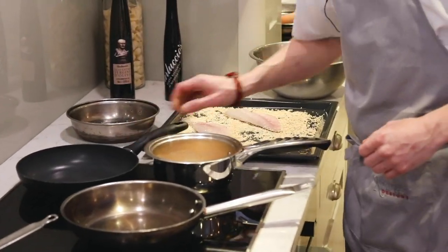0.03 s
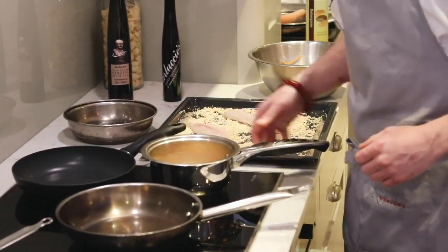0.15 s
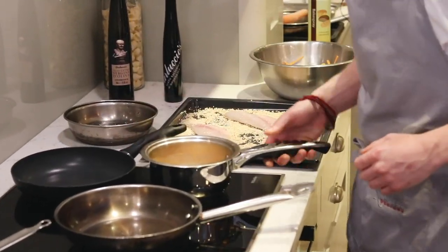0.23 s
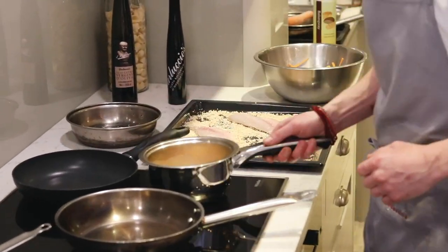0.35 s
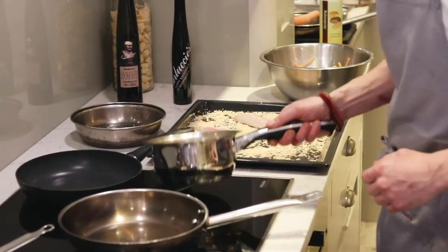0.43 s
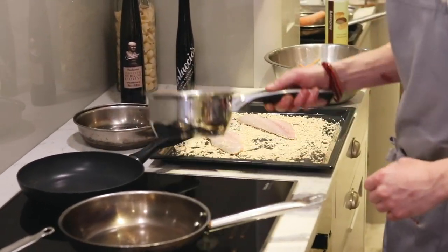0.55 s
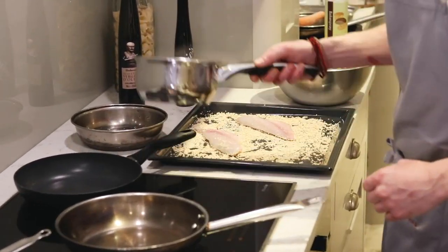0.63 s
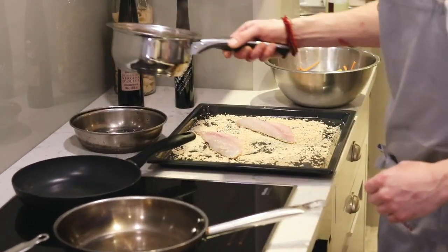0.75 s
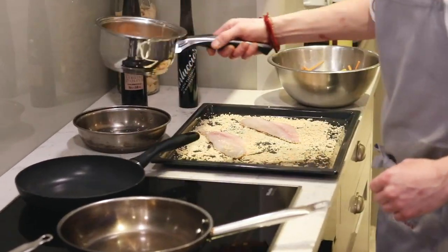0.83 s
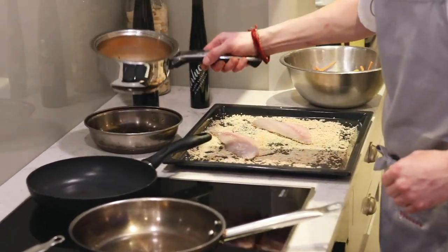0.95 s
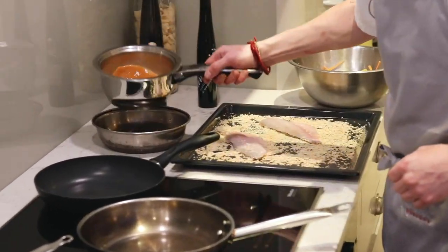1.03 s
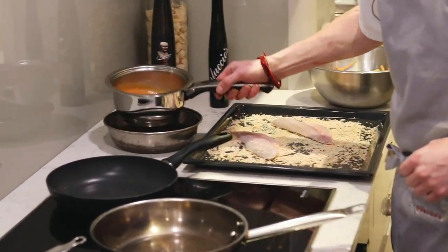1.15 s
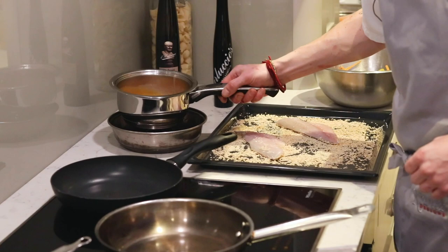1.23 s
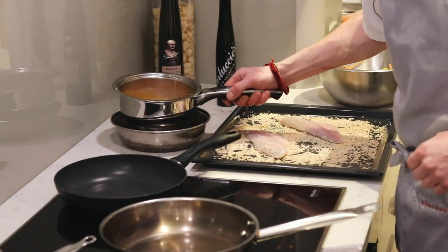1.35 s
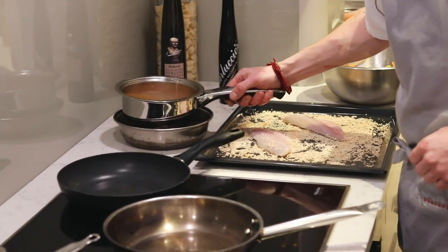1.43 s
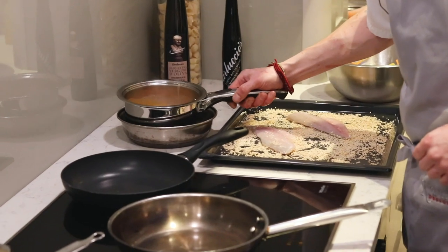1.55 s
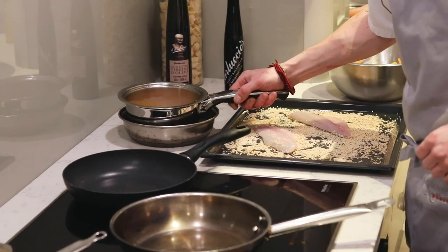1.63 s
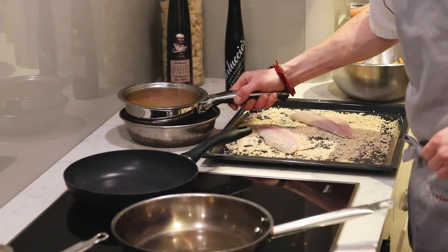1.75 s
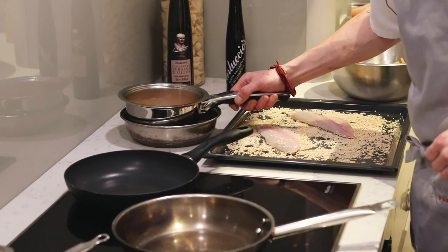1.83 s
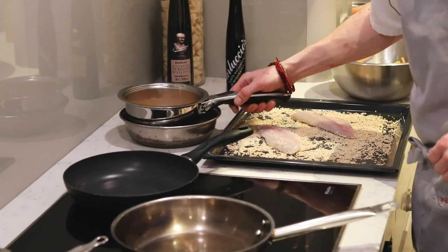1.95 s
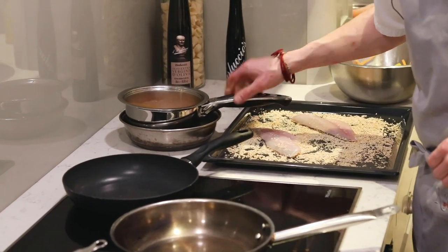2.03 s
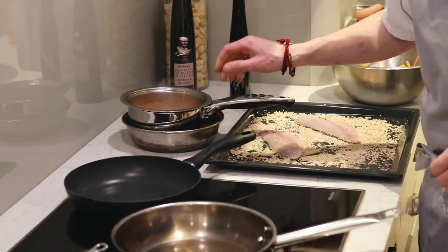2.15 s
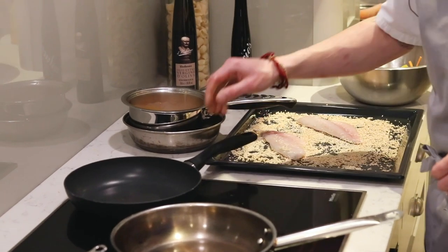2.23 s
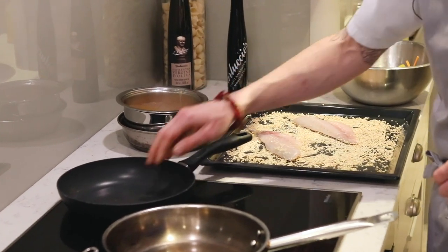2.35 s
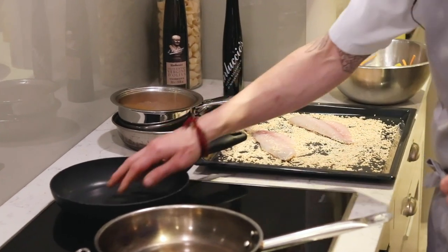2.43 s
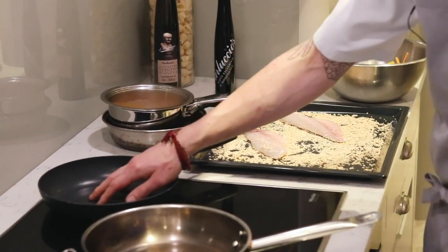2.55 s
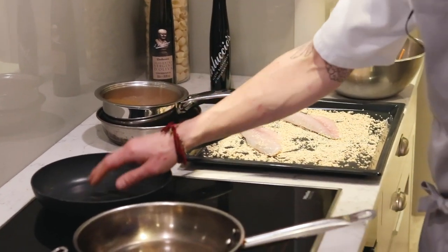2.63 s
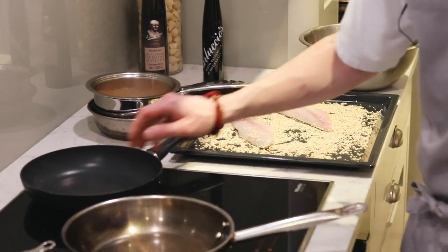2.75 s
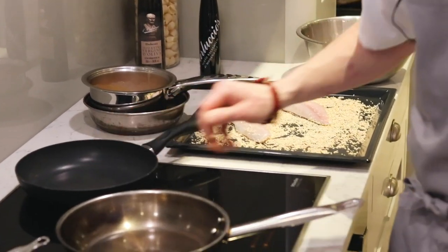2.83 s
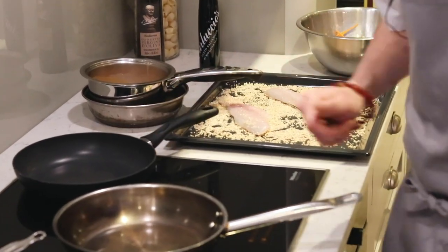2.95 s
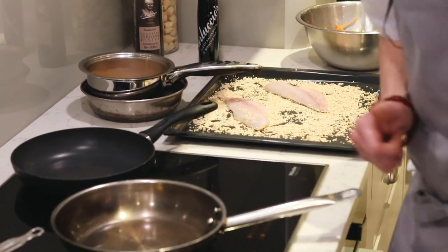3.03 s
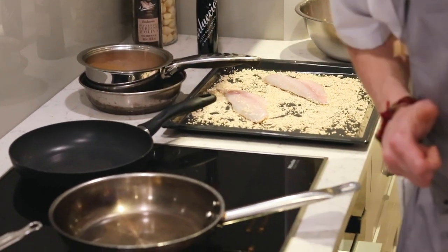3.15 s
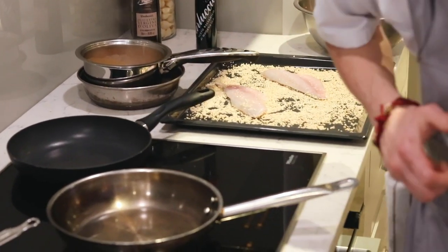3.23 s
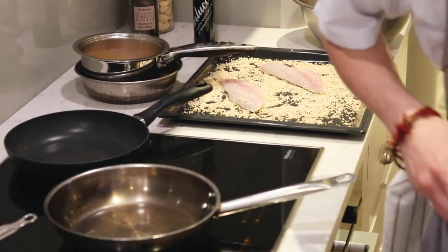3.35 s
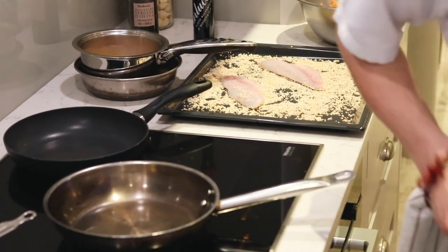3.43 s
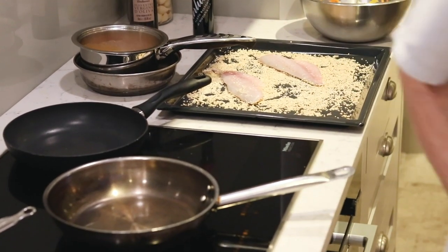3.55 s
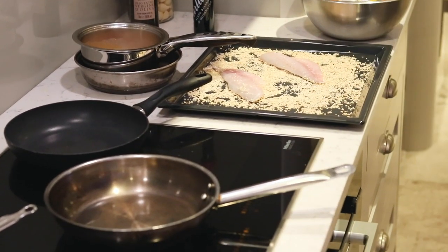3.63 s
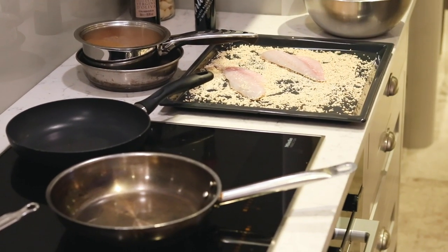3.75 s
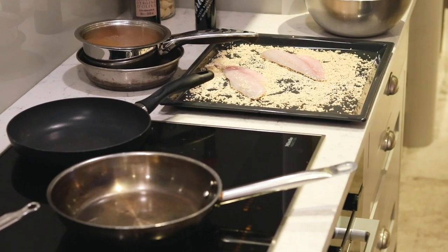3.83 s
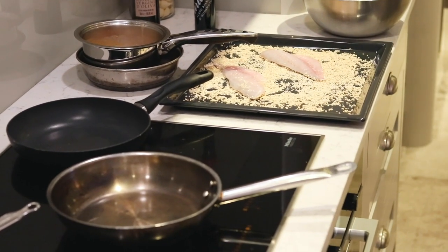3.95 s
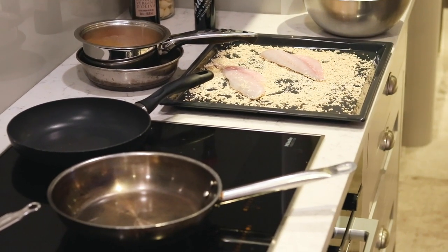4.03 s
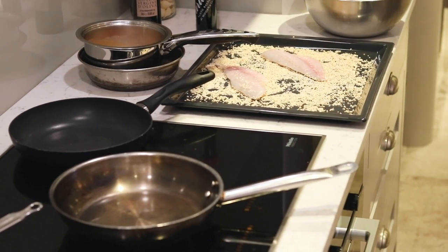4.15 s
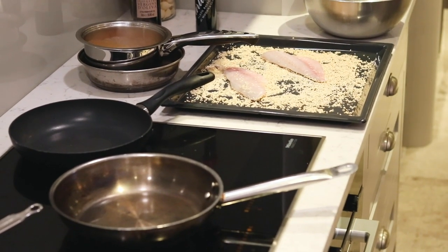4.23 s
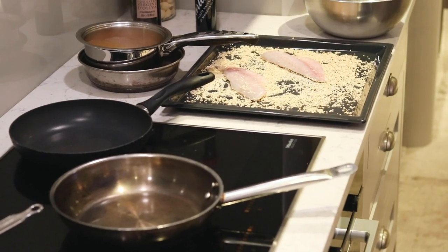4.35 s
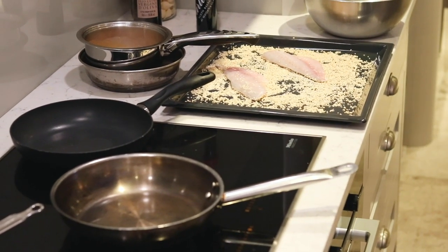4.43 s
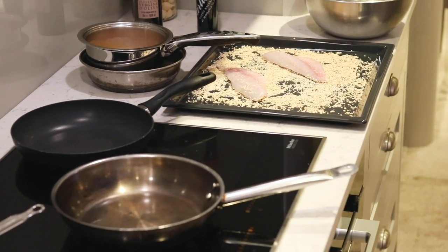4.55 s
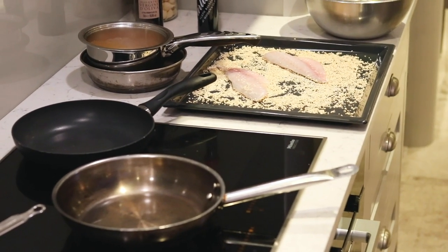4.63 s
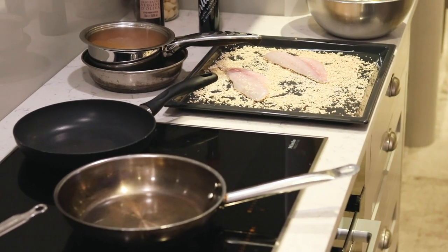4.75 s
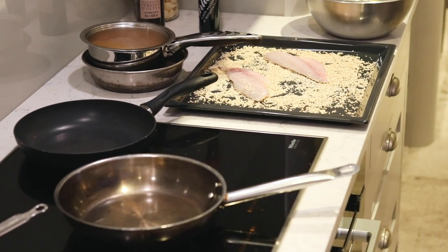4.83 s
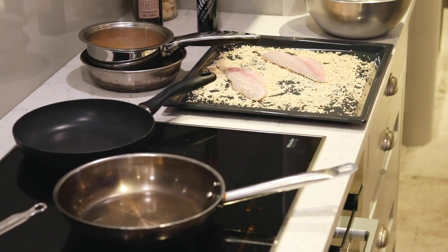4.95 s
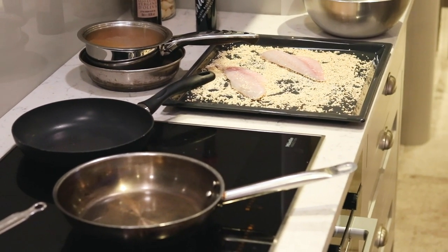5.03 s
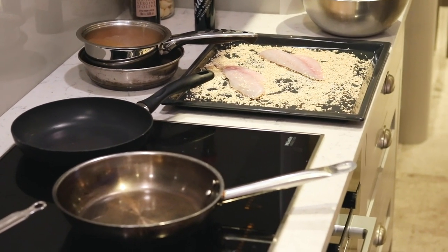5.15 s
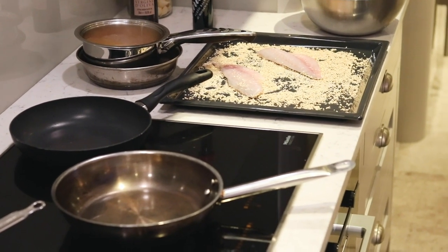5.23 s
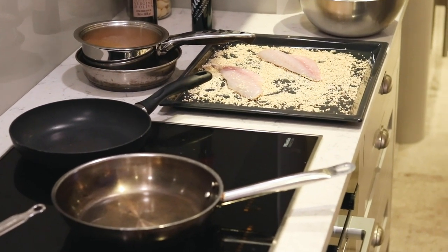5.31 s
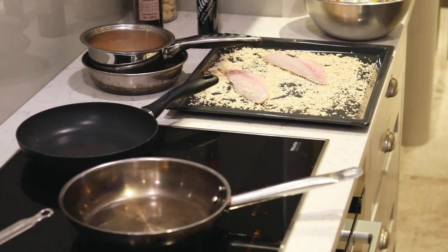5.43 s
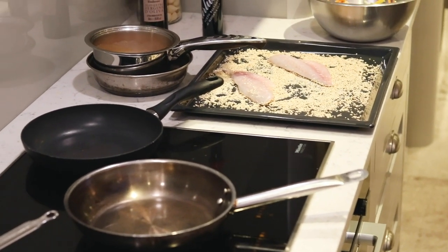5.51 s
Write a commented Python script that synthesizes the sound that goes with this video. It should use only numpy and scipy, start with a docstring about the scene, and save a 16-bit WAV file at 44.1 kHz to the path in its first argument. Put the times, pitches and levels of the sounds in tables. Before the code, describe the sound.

A small, hard-surfaced kitchen with a faint low hob hum and thin metallic hiss. A saucepan is lifted with a light scrape, then lands with a loud ringing clank in a shallow steel pan. It rocks twice on its rim and its handle ticks. Soft thuds and a hissing surge follow, then a hollow drawer creak and a late short slide ending in dull knocks. Close microphone, nearly mono.

```python
"""A saucepan in a small kitchen

A saucepan lands in a shallow steel pan, rocks twice on its rim and its handle ticks: blows, ringing modes and noise.
The hob hums at twice the mains, and noise pulsing at that rate hisses through the pans' high resonances.
Soft thuds and a drawer's creak are fading sine notes; a drawer, a slide and rustles are shaped friction noise.
A hard small kitchen answers with fading noise tails, over steady air noise."""
import sys
import numpy as np
from scipy import signal
from scipy.fft import rfft, irfft, next_fast_len
from scipy.io import wavfile
from scipy.ndimage import uniform_filter1d, map_coordinates

SR = 44100
rng = np.random.default_rng(int(sys.argv[2]) if len(sys.argv) > 2 else 0)


def store_pcm(level_fs):
    """Save levels as 16-bit WAV."""
    pcm = np.round(np.clip(level_fs, -1, 1) * 32767).astype(np.int16)
    wavfile.write(sys.argv[1], SR, np.atleast_2d(pcm).T)


N = 246078
HUM_HZ = 100


def amp(db):
    """Turn decibels into a gain."""
    return 10 ** (np.asarray(db) / 20)


def unit(x):
    """Scale a signal to rms 1."""
    return x / np.sqrt(np.mean(x ** 2) + 1e-20)


def along(points, hz):
    """Read a curve of (hz, value) points, with straight lines on a log frequency axis."""
    point_hz, values = np.transpose(points)
    return np.interp(np.log(hz + 1), np.log(point_hz + 1), values)


def curves(rows, outside=None):
    """Draw each column after the time as a curve with one value per sample."""
    times, *columns = np.transpose(rows)
    return [np.interp(np.arange(N) / SR, times, column, outside, outside) for column in columns]


def wobble(rate):
    """A smooth random curve through this many random points a second."""
    points = rng.standard_normal(int(N * rate / SR) + 4)
    return map_coordinates(points, [np.arange(N) * rate / SR])


def filtered(x, response):
    """Multiply the spectrum of x by a response to frequency."""
    n = x.shape[-1]
    padded = next_fast_len(n + 8192)
    return irfft(rfft(x, padded) * response(np.fft.rfftfreq(padded, 1 / SR)), padded)[..., :n]


def noise(colour, size=N):
    """Noise of rms 1 whose spectrum follows a colour table."""
    return unit(filtered(rng.standard_normal(size), lambda hz: amp(along(colour, hz))))


def notes(rows, cycles, rise_cycles):
    """Fading sine notes; lower ones swell and ring longer, as both times are counted in cycles."""
    out, t = np.zeros(N + SR), np.arange(SR // 2) / SR
    for start, db, hz in rows:
        fade = amp(db - 60 * t * hz / cycles)
        rise = 1 - np.exp(-t * hz / rise_cycles)
        out[round(start * SR):][:len(t)] += fade * rise * np.sin(2 * np.pi * hz * t)
    return out[:N]


def pressure(rows):
    """The loudness of strokes that each swell, hold and fade."""
    total = 0
    for start, rise, hold, fade, db in rows:
        times = np.cumsum([start, rise, hold, fade])
        levels = db + np.array([-30, 0, 0, -30])  # dB
        total = total + amp(curves(np.c_[times, levels], -120)[0])
    return total


def rubbed(rows, colour):
    """Friction: coloured noise roughened by a fast uneven grip and shaped by the pressure."""
    grip = amp(1.6 * wobble(250))
    return pressure(rows) * unit(grip * noise(colour))


def struck(contacts, pitches, modes, colour, wash, blow_hz,
           clatter_db, clatter_t60, wash_db, wash_t60, rise=0.00046):
    """Each contact is a short blow, clear modes, a clatter and a wash of modes too dense to tell apart."""
    out, t = np.zeros(N + SR), np.arange(SR // 2) / SR
    for start, db, ring_db, blow_db in contacts:
        # the blow loses 11.3 dB a cycle
        blow = amp(blow_db - 11.3 * blow_hz * t) * np.sin(2 * np.pi * blow_hz * t)
        ring = 0
        for hz, (level, t60) in zip(pitches, modes):
            # round pans split each mode into close pairs, which beat
            beat_hz = rng.uniform(10.3, 35)
            beats = 1 + 0.6 * np.cos(2 * np.pi * (beat_hz * t + rng.random()))
            ring = ring + amp(level - 60 * t / t60) * beats * np.sin(2 * np.pi * hz * t)
        clatter = noise(colour, size=len(t)) * amp(clatter_db - 60 * t / clatter_t60)
        dense = noise(wash, size=len(t)) * amp(wash_db - 60 * t / wash_t60)
        onset = 1 - np.exp(-t / rise)
        hit = blow + amp(ring_db) * ring + clatter + dense
        out[round(start * SR):][:len(t)] += amp(db) * hit * onset
    return out[:N]


def hum():
    """The hob hums at twice the mains, with a third partial that comes and goes."""
    # hum loudness: time_s, level_db
    loudness = [(0, -56.5), (.6, -59.5), (1.9, -55.5), (2.7, -58.5), (3.1, -59.5), (3.65, -69.5),
                (4.2, -63.5), (4.9, -65), (5.2, -67), (5.58, -67)]
    turn = 2 * np.pi * HUM_HZ * np.arange(N) / SR
    hum_db, = curves(loudness)
    base = amp(hum_db + 0.52 * wobble(7.2)) * np.sin(turn)
    partials = np.sin(3 * turn) + 0.2 * np.sin(2 * turn) + 0.2 * np.sin(6 * turn)
    upper = amp(-78 + 5.5 * wobble(5.7)) * partials
    return np.sqrt(2) * (base + upper)  # a sine of rms 1 peaks at root 2


def resonances(peaks):
    """A response with one peak for each resonance, neighbours in opposite sign."""
    def response(hz):
        total = 0
        for k, (centre, width, db) in enumerate(peaks):
            peak = 1j * hz * width / (centre ** 2 - hz ** 2 + 1j * hz * width)
            total = total + amp(db) * peak * (-1) ** k
        return total
    return response


def pan_hiss():
    """Noise pulsing at the hum rate hisses through the pans' resonances."""
    # hiss loudness: time_s, empty_pan_db, stacked_pans_db
    loudness = [(0, -72, -88), (1.2, -74, -94.5), (2.1, -72, -76.5), (2.5, -72, -63.5), (3, -72, -62.5),
                (3.6, -80, -70.5), (5.58, -88, -69.5)]
    # resonances of the empty pan: pitch_hz, width_hz, level_db
    empty_pan = [(2670, 52, -9.5), (4890, 30.9, 1), (5300, 8.7, 5), (6050, 76, -4.5), (6804, 92, -15.5),
                 (7160, 47, -12.5), (7960, 39.03, -3.5), (8900, 56, -10), (10960, 130, -13.5),
                 (12000, 81, -8.5)]
    # resonances of the stacked pans: pitch_hz, width_hz, level_db
    stacked_pans = [(2710, 48, -6), (4704, 150, -5.5), (5236, 200, 3), (6290, 89, -1.5), (6800, 86, -12.5),
                    (7580, 90, -19), (8000, 41, -11.5), (9890, 56, -8), (10264, 35, -0.5)]
    pulse = 1 + 0.3 * np.cos(2 * np.pi * HUM_HZ * np.arange(N) / SR)
    hiss = 0
    for level_db, peaks in zip(curves(loudness), (empty_pan, stacked_pans)):
        z = signal.stft(pulse * rng.standard_normal(N), nperseg=512)[2]
        # smooth random patches let each resonance come and go
        patches = uniform_filter1d(rng.standard_normal(z.shape), 5, 0)
        patches = uniform_filter1d(patches, 12, 1)
        drive = signal.istft(z * amp(1.3 * unit(patches)), nperseg=512)[1][:N]
        hiss = hiss + amp(level_db) * unit(filtered(drive, resonances(peaks)))
    return hiss


def surge():
    """A broader hiss, pulsing at the hum rate and uneven in level, surges for about a second."""
    # surge loudness: time_s, level_db
    loudness = [(2.45, -93.5), (2.55, -68.5), (2.77, -59), (2.93, -69.5), (3.14, -60), (3.31, -61.5),
                (3.42, -75), (3.55, -92)]
    # surge spectrum: frequency_hz, density_db (per Hz)
    colour = [(2350, -54), (4000, -28.5), (4480, -20.5), (4750, -8), (5220, 3), (5460, -2.5), (5780, -17),
              (6750, -20.5), (7500, -22), (9750, -46.5), (16500, -120)]
    pulse = 1 + 0.32 * np.cos(2 * np.pi * HUM_HZ * np.arange(N) / SR)
    rough = pulse * amp(1.2 * wobble(60)) * noise(colour)
    return amp(curves(loudness, -120)[0] + 2.4 * wobble(14)) * unit(rough)


def air():
    """Steady coloured noise whose level drifts slightly."""
    # air spectrum: frequency_hz, density_db (per Hz)
    colour = [(12, -48.5), (20, -18.5), (48, -11), (100, -12), (170, -15.5), (310, -12), (386, -13),
              (832, -18), (1060, -22.5), (3650, -31.5), (5080, -27), (5510, -31), (12400, -31.5),
              (13200, -31.5), (14200, -56.5), (14600, -120)]
    return amp(-65.5 + 0.7 * wobble(1.7)) * noise(colour)


def side_hiss():
    """Faint noise that goes to the two channels in opposite sign."""
    # spectrum of the left-right difference: frequency_hz, density_db (per Hz)
    colour = [(12, -28), (20, -7.5), (928, -7.5), (1190, -12), (1740, -11.5), (2170, -11.5), (12900, -6.5),
              (14000, -21.5)]
    return amp(-74.5) * noise(colour)


def thuds():
    """Soft low thuds through floor and cupboards: sine notes that die within a few cycles."""
    # thuds: start_s, level_db, pitch_hz
    rows = [(0.0, -48, 50), (0.327, -43.5, 213), (0.4, -55, 48), (2.571, -37, 62.6), (2.575, -41, 257),
            (2.6, -42.5, 76), (2.65, -46, 66), (3.109, -50.5, 168), (3.755, -49, 45.4), (4.137, -56, 130),
            (5.13, -53, 45), (5.216, -42.5, 149), (5.299, -37, 174), (5.313, -42, 170)]
    return notes(rows, cycles=7.2, rise_cycles=0.3)  # cycles to fall 60 dB, and to swell


def wooden_notes():
    """Hollow wooden notes, knocks and the jerks of a creak: sine notes that ring longer."""
    # notes: start_s, level_db, pitch_hz
    rows = [(0.0, -41.5, 270), (0.002, -44.5, 446), (0.022, -50, 617), (0.31, -44, 472),
            (0.375, -50.5, 592), (4.208, -45, 519), (4.228, -40, 486), (4.245, -47, 426), (4.3, -48, 457),
            (4.334, -44, 667), (4.353, -36.5, 456), (4.396, -35, 655), (4.418, -41.5, 433),
            (4.429, -38, 213.3), (4.48, -44.5, 430), (4.503, -54, 210)]
    return notes(rows, cycles=35.4, rise_cycles=2.36)


def lift():
    """Short bright rubbing strokes as the saucepan is lifted."""
    # strokes: start_s, rise_s, hold_s, fade_s, level_db
    rows = [(0.3, .006, 0.013, 0.033, -59.5), (0.305, 0.018, 0.014, .09, -57.5), (.36, .03, 0.14, .06, -74)]
    # spectrum: frequency_hz, density_db (per Hz)
    colour = [(530, -43), (900, -10), (1390, -12.5), (1610, -6), (2460, -5.5), (3010, -8.5), (3360, -1),
              (13000, -17)]
    return rubbed(rows, colour)


def taps():
    """A pan ticks on the hob: hard contacts with a few high modes."""
    # contacts: start_s, level_db, ring_db, blow_db
    contacts = [(0.305, -49.5, -5, -4), (2.814, -34, -16, -10), (5.3255, -50, -18.5, -10)]
    # mode pitches: pitch_hz
    pitches = [4900, 5086, 5900, 8000]
    # modes: level_db, t60_s (time to fall 60 dB)
    modes = [(12, 0.039), (-18, 0.056), (4, 0.09), (1, 0.017)]
    # spectrum of clatter and wash: frequency_hz, density_db (per Hz)
    colour = [(1470, -68), (2500, -43), (3890, -44), (5020, 10), (6050, -38), (6430, -36), (13000, -52)]
    return struck(contacts, pitches, modes, colour, colour, blow_hz=4500, clatter_db=-3.0,
                  clatter_t60=0.03, wash_db=-13.5, wash_t60=0.15, rise=0.00032)


def landing():
    """The saucepan lands: a cluster of contacts sets many steel modes ringing."""
    # contacts: start_s, level_db, ring_db, blow_db
    contacts = [(1.2188, -7.5, -28, -19.5), (1.2202, -7.5, -29, 7.5), (1.2275, -9, -15.5, 1),
                (1.231, -15, -17.5, -6)]
    # mode pitches: pitch_hz
    pitches = [150, 260, 335, 452, 583, 716, 875, 1300, 1675, 1778, 2471, 2105, 4562, 4680, 4802, 5021,
               5211, 5910, 6115, 6331, 6853, 7560, 7693, 8323, 8882, 9900, 10900, 11340, 12140]
    # modes: level_db, t60_s
    modes = [(-1.5, 0.019), (-17, 0.44), (-6, 0.072), (-4.5, .2), (-8.5, 0.11), (-6.5, .2), (-5, 0.53),
             (-2, 0.36), (-4, .3), (-25.5, 1), (-8.5, 0.22), (-10, 0.23), (-30.5, 0.34), (-16.5, 0.2),
             (-8, 0.32), (-26, 0.453), (-16, 0.45), (-7, 0.11), (-23.5, .55), (-19.5, 0.1), (-30, 0.47),
             (-8, 0.24), (-19, 0.13), (-41, .2), (-24.5, 0.31), (-31, 0.42), (-21.5, .2), (-20.5, .27),
             (-26.5, .28)]
    # spectra of the clatter and the wash: frequency_hz, density_db (per Hz)
    colour = [(47, -40), (80, -6), (777, -7.5), (1610, -4), (1920, -9.5), (3640, -6), (4850, -8),
              (5500, -24.5), (5920, -2.5), (6610, -3.5), (6900, -4), (7200, -17.5), (7700, -3.5),
              (8200, -18.5), (8900, -9.5), (10500, -16), (11700, -10.5), (15600, -36)]
    wash = [(150, -37), (340, -16.5), (530, 1.5), (880, 0), (1150, -2), (1730, 1.5), (2300, -8),
            (3300, -12), (4200, -22), (4850, -11.5), (5550, -38), (6050, -19.5), (7700, -24.5),
            (13500, -46)]
    return struck(contacts, pitches, modes, colour, wash, blow_hz=653, clatter_db=-7,
                  clatter_t60=0.046, wash_db=-22.0, wash_t60=0.6)


def rocking():
    """The saucepan rocks twice on its rim, each time striking lower and middle modes."""
    # contacts: start_s, level_db, ring_db, blow_db
    contacts = [(1.7072, -13, -16, 7.4), (1.8214, -14.5, -15.5, 12.6)]
    # mode pitches: pitch_hz
    pitches = [441, 732, 856, 1025, 1148, 1190, 1227, 1365, 1500, 1830, 2089, 2395, 2546, 3042, 3354, 3413,
               4786]
    # modes: level_db, t60_s
    modes = [(-14, 0.15), (-11, 0.055), (-3, 0.17), (-15, 0.35), (-9, 0.088), (3, 0.21), (-9, 0.23),
             (0, 0.145), (-5, 0.144), (3.5, 0.059), (-10.5, 0.14), (-9.5, 0.25), (-5.5, 0.2), (-22.5, 0.14),
             (-10.5, 0.13), (-22.5, 0.2), (-20, 0.11)]
    # spectra of the clatter and the wash: frequency_hz, density_db (per Hz)
    colour = [(71, -58), (120, -29), (720, -15), (933, -16.5), (1190, -7), (2380, -14), (2580, -19.5),
              (3020, -28), (3340, -24), (9030, -32), (14000, -54.5)]
    wash = [(88, -62), (150, -40), (310, -13), (532, -6), (864, -12), (954, -20), (1200, -2.5), (2180, -34),
            (2480, -15), (2700, -20), (4500, -35.5), (5850, -64), (9900, -120)]
    return struck(contacts, pitches, modes, colour, wash, blow_hz=1125, clatter_db=-11.5,
                  clatter_t60=0.093, wash_db=-14.5, wash_t60=0.23)


def handle_ticks():
    """The saucepan handle ticks: very sudden contacts with high modes."""
    # contacts: start_s, level_db, ring_db, blow_db
    contacts = [(1.8344, -26.5, -14.5, -14), (1.8894, -37.5, -29, 2), (2.2646, -24.5, -12, 3.5)]
    # mode pitches: pitch_hz
    pitches = [2697, 5103, 5233, 5642, 6417, 7569, 10215]
    # modes: level_db, t60_s
    modes = [(-22.5, .2), (0, 0.11), (-2, 0.079), (-20, 0.2), (-23, 0.34), (-19, 0.13), (-5, 0.13)]
    # spectra of the clatter and the wash: frequency_hz, density_db (per Hz)
    colour = [(880, -59.5), (1500, -45), (2700, -19.5), (4190, -11.5), (5250, 6.5), (8610, -35),
              (10400, -3), (11000, -36.5), (14000, -30)]
    wash = [(1060, -69), (1800, -23), (2610, -2.5), (2840, -6), (4220, -6), (5190, -2), (7170, -13),
            (9260, -16), (10400, -8), (13000, -33)]
    return struck(contacts, pitches, modes, colour, wash, blow_hz=4800, clatter_db=-7.0,
                  clatter_t60=0.044, wash_db=-22.5, wash_t60=0.2, rise=0.0001)


def steel():
    """All struck steel, with everything below about 90 Hz cut away."""
    hits = taps() + landing() + rocking() + handle_ticks()
    return filtered(hits, lambda hz: (1j * hz / (90 + 1j * hz)) ** 3)


def rustle():
    """Faint rustles of hands and cloth: soft, broad friction noise."""
    # strokes: start_s, rise_s, hold_s, fade_s, level_db
    rows = [(2.075, 0.021, .004, 0.019, -66), (2.9, 0.079, 0.23, 0.12, -71.5),
            (4.08, 0.092, 0.065, .07, -69), (4.29, 0.035, .005, 0.064, -73), (5.35, 0.028, .005, 0.21, -65),
            (5.46, 0.082, .02, .1, -65.5)]
    # spectrum: frequency_hz, density_db (per Hz)
    colour = [(300, -41), (700, -5), (2000, -4), (4000, -5), (8000, -9), (13000, -9.5), (14200, -59.5)]
    return rubbed(rows, colour)


def brush():
    """One soft brushing stroke of friction noise."""
    # stroke: start_s, rise_s, hold_s, fade_s, level_db
    rows = [(3.2, 0.16, 0.011, 0.31, -67)]
    # spectrum: frequency_hz, density_db (per Hz)
    colour = [(1180, -42), (2000, -14), (2240, -9), (2390, -9.5), (3670, -5), (4500, -7.5), (5850, -37),
              (9900, -120)]
    return rubbed(rows, colour)


def drawer():
    """The drawer rubs in three strokes, each louder than the last."""
    # strokes: start_s, rise_s, hold_s, fade_s, level_db
    rows = [(4.15, 0.074, .01, .08, -75), (4.31, .03, .005, 0.11, -67), (4.404, 0.012, 0.028, 0.15, -50)]
    # spectrum: frequency_hz, density_db (per Hz)
    colour = [(350, -32), (600, -8), (651, -11), (722, -2), (865, 2), (1080, 2), (1810, -12.5), (2010, -24),
              (2400, -38), (3120, -50), (5280, -120)]
    return rubbed(rows, colour)


def slide():
    """A short slide of friction noise with a quick end."""
    # stroke: start_s, rise_s, hold_s, fade_s, level_db
    rows = [(5.04, 0.099, 0.099, 0.024, -52.5)]
    # spectrum: frequency_hz, density_db (per Hz)
    colour = [(120, -33), (200, -2.5), (369, -6), (591, 2.5), (720, -11), (1270, -0.5), (1810, 1),
              (3100, -12), (3500, -17), (5240, -22), (12800, -23), (14200, -59.5)]
    return rubbed(rows, colour)


def kitchen(x):
    """The room answers with noise tails in which each frequency dies at its own speed."""
    # room decay: frequency_hz, t60_s
    decay = [(40, .12), (120, 0.68), (500, 0.38), (1500, 0.53), (4000, 0.4), (8000, .4), (15000, 0.16)]
    out, step = np.zeros(N + 2 * SR), SR // 4  # a new tail every quarter second
    for start in range(0, N, step):
        hz, t, z = signal.stft(rng.standard_normal(SR * 3 // 4), SR, nperseg=256)
        fade = amp(-60 * t / along(decay, hz)[:, None])
        tail = signal.istft(z * fade, SR, nperseg=256)[1]
        wet = signal.fftconvolve(x[start:start + step], tail / np.linalg.norm(tail))
        out[start + 200:][:len(wet)] += wet  # the answer starts 200 samples late
    return out[:N]


def scene():
    """One sound field, heard almost alike by both channels."""
    hob = hum() + pan_hiss() + surge()
    knocks = thuds() + wooden_notes()
    pans = steel()
    strokes = lift() + rustle() + brush() + drawer() + slide()
    room = kitchen(amp(-14) * pans + amp(-6) * knocks + amp(-17.0) * strokes)
    mid = pans + knocks + strokes + room + hob + air()
    side = side_hiss()
    return np.array([mid + side, mid - side])


def record(dry):
    """Gain control ducks after loud blows and recovers; nothing from the band limit up is kept."""
    top_hz = 15784
    keep = np.exp(-1 / (0.15 * SR))  # the level is averaged over about 0.15 s
    power = signal.lfilter([1 - keep], [1, -keep], np.mean(dry ** 2, axis=0))
    loudness = np.sqrt(power + 1e-12)
    gain = (1 + (loudness / amp(-28.0)) ** 2) ** -0.15
    return filtered(dry * gain, lambda hz: hz < top_hz)


dry = scene()
out = record(dry)
store_pcm(out)
```